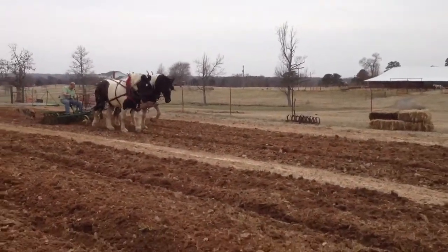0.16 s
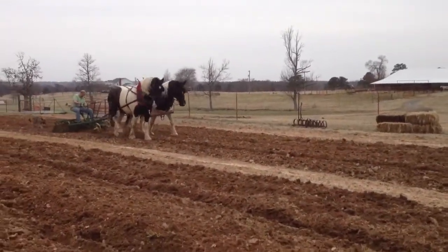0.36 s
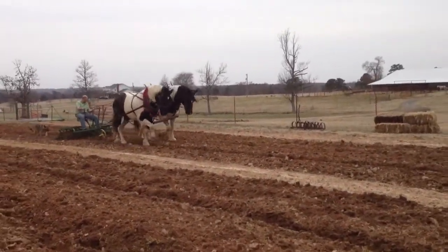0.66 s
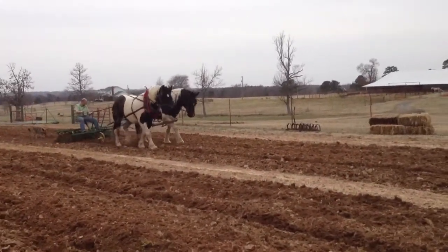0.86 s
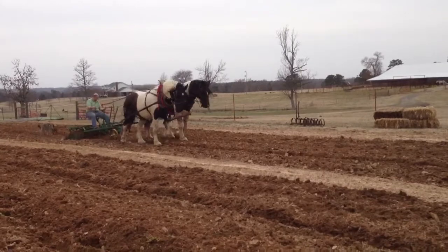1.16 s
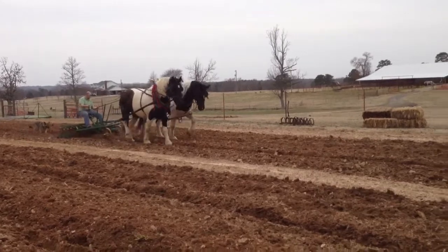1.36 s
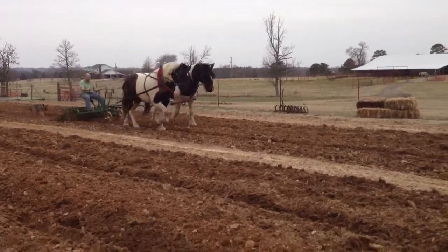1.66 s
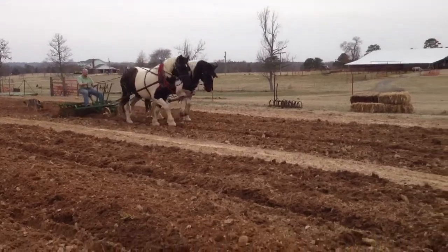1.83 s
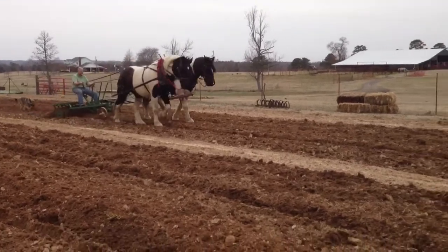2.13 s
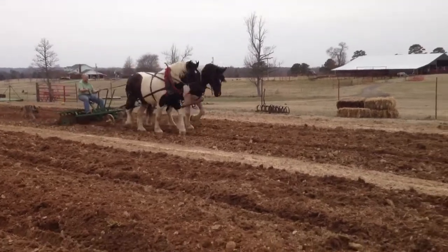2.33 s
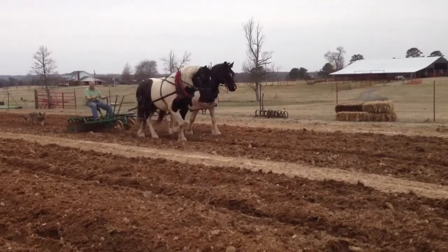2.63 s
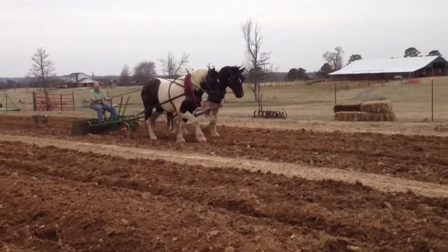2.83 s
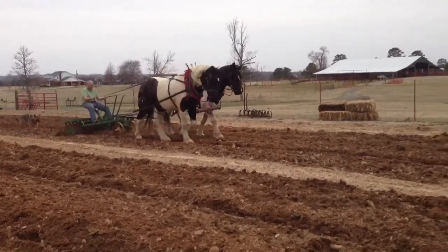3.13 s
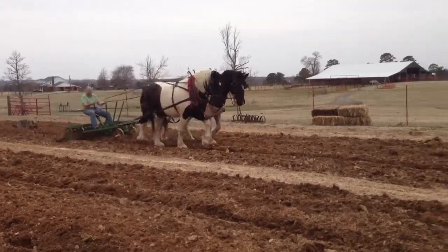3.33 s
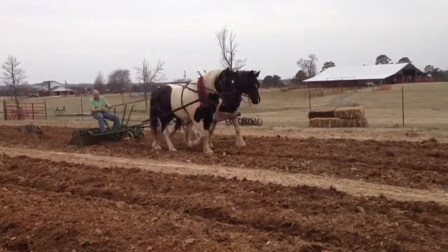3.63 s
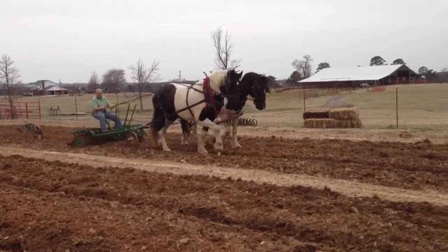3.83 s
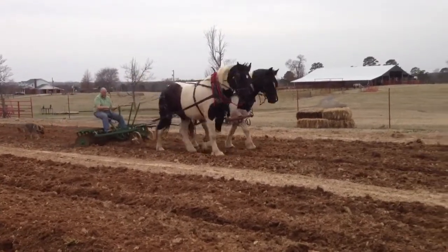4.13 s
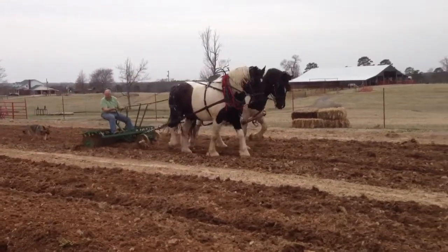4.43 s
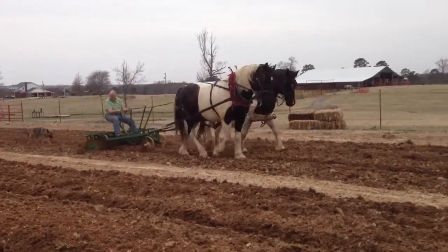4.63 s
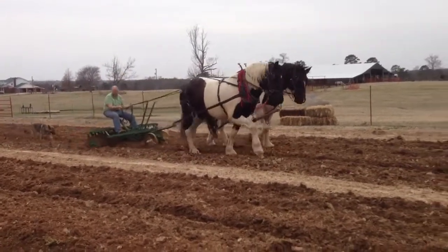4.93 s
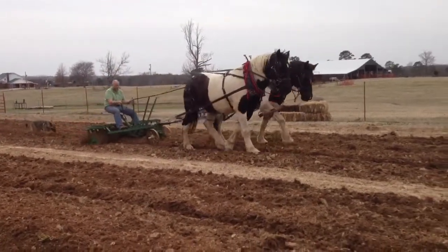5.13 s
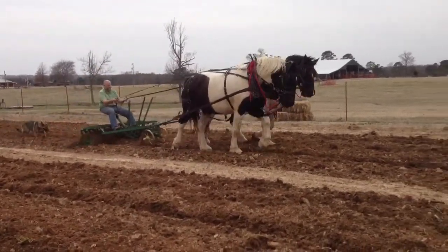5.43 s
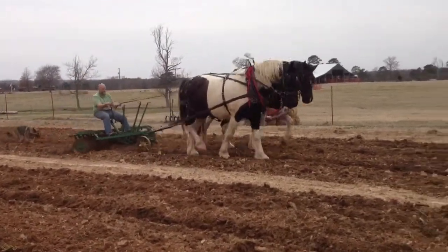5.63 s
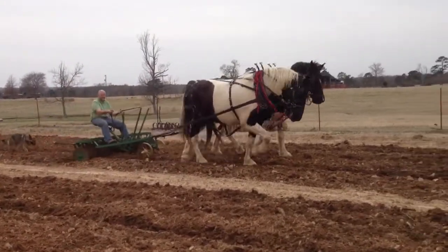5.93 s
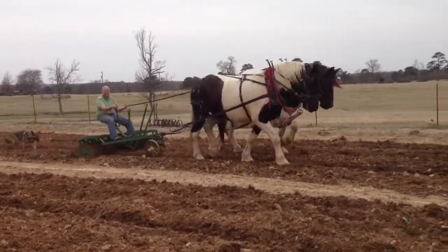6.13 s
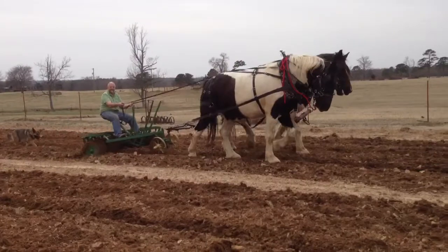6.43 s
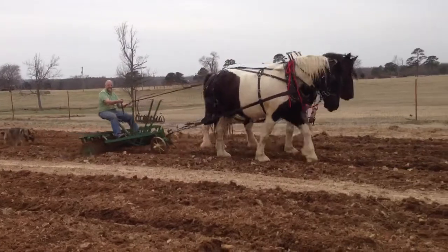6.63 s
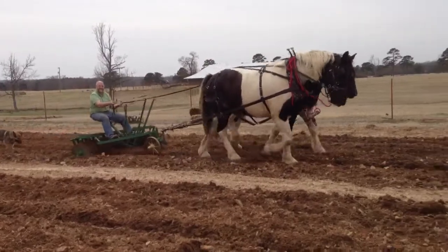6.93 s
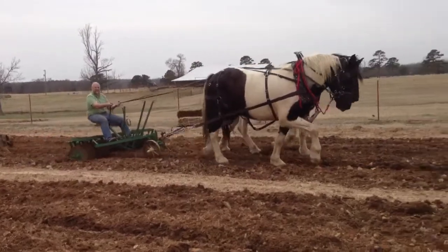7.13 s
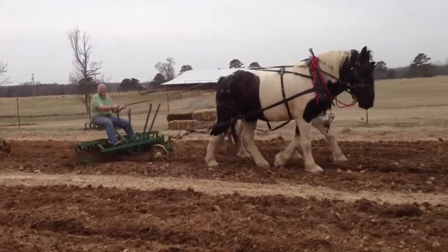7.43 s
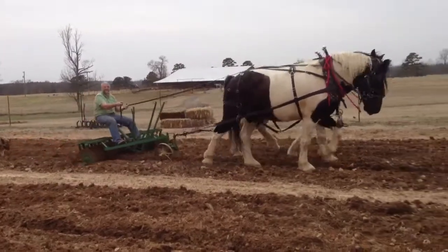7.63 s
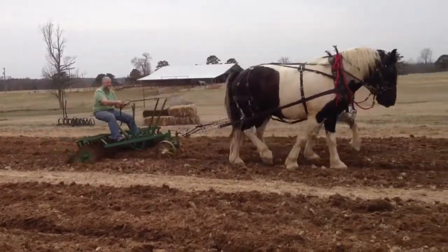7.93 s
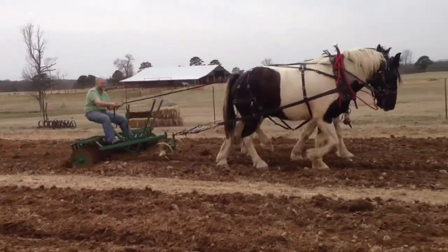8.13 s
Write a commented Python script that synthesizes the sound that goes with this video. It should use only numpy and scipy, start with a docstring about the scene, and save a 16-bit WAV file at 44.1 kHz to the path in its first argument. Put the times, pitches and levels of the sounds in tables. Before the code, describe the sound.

Outdoors in an open field, strong wind buffets an unprotected microphone with rapid low thumps and fluttering rumble for about three seconds. It then eases, uncovering the faint gritty hiss of harrow discs scraping soil, with irregular metal clatter, clinking chain links and tiny squeaks. Another gust swells around six seconds with a sharp metallic clank near its end, then calm returns with scrape and rattles.

```python
"""Gusts buffet the microphone in an open field, each puff a short low thump and a dying flutter of filtered noise.
Two horses pull a disc harrow over ploughed soil; its scrape and spray are noise coloured by ringing discs,
and random faint, short, slightly sliding tones lend the scrape a tonal grain.
Frame and hitch clatter at each jolt in bursts of noise, harness rings and chain links clink as decaying sines,
and metal squeaks or rings briefly in short, steady or sliding tones."""
import sys
import numpy as np
from scipy import signal
from scipy.fft import rfft, irfft
from scipy.io import wavfile
from scipy.ndimage import uniform_filter1d

SR = 44100
rng = np.random.default_rng(int(sys.argv[2]) if len(sys.argv) > 2 else 0)


def unload_audio(sound):
    """Save the sound as a 16-bit wav file, at the path given as the first command line argument."""
    columns = np.transpose(np.atleast_2d(sound))
    # keep every value between -1 and 1, then stretch to whole-number steps
    steps = np.round(np.clip(columns, -1, 1) * 32767)
    wavfile.write(sys.argv[1], SR, steps.astype(np.int16))


N = 364560  # samples

# Steady wind at the microphone. Each row: time in seconds, flutter level in dB before waver and lulls.
GUST_CURVE = [(0.0, -32.5), (0.14, -29.5), (0.3, -40), (0.76, -34.5), (1.24, -41), (2.02, -40), (2.67, -48),
              (2.9, -48.5), (3.13, -59), (3.66, -71), (5.02, -62), (5.36, -40.5), (5.47, -52),
              (5.73, -35.5), (5.93, -30), (6.21, -30), (6.37, -34.5), (6.99, -56), (7.29, -70), (8.26, -57)]
# Colour of the wind flutter. Each row: frequency in Hz, relative density in dB per Hz.
WIND_SPECTRUM = [(18, -68), (30, -34), (49, -43), (70, -22.5), (138, -3), (194, 1), (255, -0.5), (329, -6),
                 (500, -5), (1070, -37), (1400, -56), (1820, -48), (3080, -120)]
# Puffs on the microphone. Each row: start in seconds, thump level in dB, pitch in Hz,
# level of the dying flutter in dB relative to the thump.
PUFFS = [(0.013, -16, 280, -23), (0.046, -18, 232, -10.5), (0.085, -22, 239, -8), (0.117, -38, 214, -10),
         (0.152, -19, 203, -3.5), (0.166, -13.5, 260, -10), (0.188, -29, 207, -10),
         (0.236, -17.5, 207, -10), (0.311, -22.5, 208, -10), (0.377, -21.5, 238, -15),
         (0.444, -23, 261, -2.5), (0.464, -19.5, 397, -6), (0.523, -26, 280, -5), (0.482, -25, 420, -14),
         (0.546, -19.5, 320, -8), (0.552, -21.5, 395, -16), (0.563, -20, 250, -14), (0.593, -17, 343, -8),
         (0.64, -18.5, 232, -14), (0.691, -18.5, 273, -12), (0.755, -28.5, 430, 0), (0.801, -19, 260, -5),
         (0.812, -23, 420, -20), (0.824, -20, 276, -25), (0.833, -22.5, 302, -25), (0.879, -21, 194, -7.5),
         (0.94, -26, 328, -24), (0.955, -26.5, 222, -7), (0.9633, -22.5, 480, -14),
         (0.979, -18.5, 385, -14), (0.999, -24.5, 380, -7.5), (1.109, -24, 283, -9), (1.119, -26, 260, -22),
         (1.156, -32.5, 232, -4), (1.168, -29, 347, -18), (1.212, -27, 202, -24), (1.451, -26, 240, -3.5),
         (1.623, -19.5, 260, -6.5), (1.654, -19.5, 284, -6), (1.702, -23.5, 315, -7),
         (1.808, -14.5, 273, -13.5), (1.892, -30.5, 272, -0.5), (1.924, -27.5, 213, -2.5),
         (2.014, -33, 238, -12), (2.083, -21.5, 267, -5.5), (2.105, -24, 250, -12), (2.138, -19.5, 246, -8),
         (2.197, -19, 200, -10), (2.304, -25, 213, -11), (2.419, -39, 220, -15), (2.439, -25, 300, -4),
         (2.504, -27.5, 190, -10), (2.538, -21.5, 220, -12), (2.563, -14, 237, -16),
         (2.633, -24.5, 259, -5), (2.744, -25.5, 253, -3), (2.766, -26, 256, -21), (2.875, -43, 210, -10),
         (3.262, -37.5, 233, -17), (3.39, -33, 216, -7), (3.429, -33, 218, -20), (3.439, -28, 213, -10.5),
         (3.794, -38, 198, -7), (4.024, -36, 217, -13), (4.131, -38, 436, -6), (4.168, -40, 230, -8),
         (4.229, -35.5, 202, -12), (4.235, -44, 400, -5), (4.255, -41, 427, -7), (4.28, -47, 420, -10),
         (4.398, -41, 180, -17), (4.411, -47, 476, -3), (4.439, -38, 200, -15), (4.48, -41, 180, -10),
         (4.719, -43, 160, -7), (4.81, -45, 160, -10), (4.933, -31.5, 280, -16), (5.107, -32.5, 180, -15),
         (5.159, -43, 190, -10), (5.255, -35.5, 200, -10), (5.282, -28.5, 216, -28), (5.335, -30, 267, -7),
         (5.4, -26.5, 215, -3.5), (5.469, -23, 264, -3), (5.494, -20.5, 284, -27),
         (5.611, -26.5, 250, -9.5), (5.661, -27.5, 224, -14), (5.742, -23.5, 303, -2.5),
         (5.753, -20.5, 398, -6), (5.768, -22, 366, -13), (5.783, -23.5, 333, -5), (5.857, -30, 223, -10),
         (5.892, -29, 280, -2), (5.939, -28, 252, -12), (6.001, -19.5, 413, -1.5), (6.017, -25, 260, -20),
         (6.036, -20.5, 330, -6.5), (6.065, -19, 230, -5.5), (6.096, -19, 270, -6),
         (6.151, -19.5, 202, -5.5), (6.164, -17, 241, -18), (6.188, -25, 260, -14), (6.222, -28, 250, -12),
         (6.267, -21.5, 301, -14), (6.33, -16.5, 271, -14.5), (6.382, -24, 255, -6.5),
         (6.451, -25, 264, -14), (6.525, -40, 221, -7), (6.585, -32, 300, -14), (6.638, -31, 300, -1),
         (6.688, -35, 250, -5), (6.743, -23, 231, -7.5), (6.845, -37, 191, -19), (6.866, -34.5, 191, -26),
         (6.974, -43, 410, -11), (7.03, -43, 400, -12), (7.552, -44, 400, -4), (7.627, -39.5, 215, -10),
         (8.045, -42, 480, -17), (8.101, -44, 400, -13), (8.214, -37, 190, -5.5)]
# Brief lulls between puffs. Each row: centre in seconds, change in dB, length in seconds.
WIND_LULLS = [(0.352, -9, 0.032), (0.412, -8, 0.024), (0.509, -2.5, .05), (.578, -5.5, 0.014),
              (0.624, -5, 0.023), (0.683, -1, 0.02), (0.727, -3, .035), (0.845, -8, .015),
              (0.924, -6, 0.038), (1.077, -4.5, 0.044), (1.25, -11, 0.056), (1.4, -5, 0.021),
              (1.537, -8, 0.025), (1.785, -5, 0.029), (1.853, -10, .05), (2.058, -10, 0.046),
              (2.123, -8, 0.014), (2.266, -1, 0.033), (2.489, -2, .025), (2.727, -1, 0.062),
              (2.817, -6, .03), (5.23, -6, .05), (5.317, -12, .027), (5.553, -8, 0.06), (5.7, -5, .045),
              (5.853, -5, 0.029), (6.134, -1, 0.015), (6.301, -6, 0.033), (6.433, -3, 0.013),
              (6.5, -7, 0.033), (6.616, -8, 0.033), (6.809, -11, .05)]
# Discs in the soil. Each row: time in seconds, scrape in dB, spray of the high treble in dB,
# level of the low noise in dB, which in the gusts is partly wind; all before the flicker.
SCRAPE_CURVE = [(0.0, -54.5, -59, -39.5), (0.32, -51.5, -58.5, -65), (0.66, -53.5, -60.5, -65),
                (1.06, -50, -58.5, -59), (2.67, -50, -58, -65), (2.81, -49.5, -54.5, -64),
                (3.11, -50.5, -57, -61), (3.52, -46.5, -54.5, -56.5), (4.09, -47.5, -53.5, -58),
                (4.76, -51, -57, -58.5), (5.52, -47.5, -53, -62), (6.3, -49.5, -54.5, -50),
                (6.72, -48, -53.5, -59.5), (7.08, -49.5, -55, -57), (7.55, -49, -56.5, -56.5),
                (7.84, -47.5, -52, -50), (8.03, -51.5, -58, -55.5), (8.26, -47.5, -55.5, -48)]
# Colour of the scraped soil. Each row: frequency in Hz, relative density in dB per Hz.
SOIL_SPECTRUM = [(35, -78), (60, -10.5), (142, -4.5), (253, -19), (403, 5.5), (705, -7.5), (849, 2),
                 (1150, 2), (1380, 3), (1670, 3), (4220, 5), (9080, -4), (13800, -15), (15500, -16)]
# Resonances of the discs. Each row: frequency in Hz, width in Hz, height in dB over the soil.
DISC_RINGS = [(425, 480, 0), (820, 92, 2.5), (1392, 110, 6.5), (2030, 25, 4.5), (2900, 220, 2.5),
              (4420, 140, 0.5), (4300, 180, 1), (5730, 270, 3), (8700, 37, 8.5)]
# Jolts of frame and hitch. Each row: peak time in seconds, nominal level in dB, ring in Hz,
# treble in dB relative to the jolt, fall in ms per 60 dB, rise in ms per 60 dB.
MAIN_JOLTS = [(.126, -56, 4200, 2, 30, 10), (.152, -47, 4230, -10, 150, 13),
              (.1886, -41.5, 4100, -6.5, 72, 20), (.241, -50, 4200, 1, 30, 10),
              (.263, -50, 4100, -8, 150, 44), (.448, -37, 2960, -19, 40, 15),
              (.455, -44, 2140, -4, 124, 30), (.518, -45, 4300, -0.5, 28, 10), (.702, -62, 4200, 2, 25, 10),
              (.79, -52, 5600, -2, 25, 10), (.845, -50, 1376, -18, 200, 25),
              (.855, -48.5, 4220, -5, 40, 15), (.935, -56, 4600, -1, 25, 10), (.96, -47, 4250, -8, 30, 12),
              (.979, -47, 4030, -3, 30, 17), (1.0117, -38.5, 4220, -17, 35, 14),
              (1.0215, -31, 4400, -26, 26, 1), (1.0235, -33, 3570, -27, 43, 8),
              (1.036, -39, 3700, -17, 50, 50), (1.046, -41, 4300, -12, 30, 15),
              (1.0495, -30.5, 4270, -29, 35, 23), (1.053, -38.5, 1460, -27, 50, 40),
              (1.057, -36.5, 3260, -27, 52, 60), (1.0605, -41, 4300, -25, 30, 25),
              (1.0625, -39.5, 1570, -25, 47, 25), (1.129, -48, 5600, -7, 28, 12),
              (1.133, -41, 4400, -15, 29, 22), (1.265, -43, 980, -18, 68, 23),
              (1.2705, -44, 4900, -14, 40, 20), (1.2784, -36, 4330, -16, 41, 14),
              (1.281, -35, 1096, -24, 40, 12), (1.2825, -44, 2930, -20, 40, 12),
              (1.287, -36.5, 1040, -24, 52, 20), (1.3214, -40.5, 2890, 1, 40, 14),
              (1.327, -43, 2860, -3, 70, 20), (1.421, -50, 4250, -16, 40, 20),
              (1.519, -53, 5600, -2, 30, 10), (1.566, -53, 5600, 3, 30, 10),
              (1.642, -38.5, 5940, -7, 74, 15), (1.697, -49, 3600, -12, 35, 15),
              (1.852, -42, 3320, -10, 30, 20), (1.887, -38.5, 4230, -17, 34, 21),
              (2.003, -55, 5600, 5, 25, 10), (2.074, -47, 2680, 4, 25, 13), (2.147, -42, 1400, -13, 50, 80),
              (2.187, -42, 1400, -18, 40, 15), (2.229, -46, 3600, -14, 35, 15),
              (2.296, -42.5, 4630, 1, 120, 6), (2.3005, -32, 1088, -19, 64, 10),
              (2.309, -36.5, 3050, -17, 80, 20), (2.3233, -33.5, 2920, -9, 25, 20),
              (2.403, -45, 2970, -1, 40, 15), (2.65, -38, 5380, -21, 53, 38),
              (2.692, -40, 4100, -14, 122, 90), (2.786, -45, 4250, 2, 30, 10),
              (2.849, -51, 2900, -14, 38, 17), (2.982, -48, 2920, 0, 35, 12), (3.048, -52, 5550, 2, 30, 10),
              (3.138, -51, 3580, -14, 30, 12), (3.1685, -41, 3390, -22, 60, 12),
              (3.247, -46, 5260, -16, 23, 10), (3.301, -46, 2900, -14, 40, 40),
              (3.3456, -37.5, 4410, 5.5, 106, 5), (3.354, -37.5, 2810, -6, 43, 22),
              (3.3535, -37, 4400, -10, 30, 15), (3.3555, -32.5, 1250, -12, 40, 25),
              (3.382, -45, 4400, -2, 40, 40), (3.392, -41.5, 3460, 0, 90, 120),
              (3.507, -44, 4250, -10, 30, 20), (3.514, -33, 3200, -12, 30, 18),
              (3.577, -43, 2130, -20, 170, 25), (3.663, -39.5, 3550, -19, 36, 25),
              (3.804, -40.5, 2970, -6, 80, 28), (3.819, -35.5, 1895, -19, 60, 72),
              (3.893, -42, 2850, -15, 85, 8), (4.042, -36, 3400, -19, 40, 36),
              (4.137, -41.5, 3600, -14, 35, 15), (4.153, -48, 1400, -3, 35, 15),
              (4.229, -33.5, 3720, -15, 35, 30), (4.247, -37.5, 1510, -12, 50, 62),
              (4.2585, -35.5, 3240, -8, 61, 40), (4.2885, -32, 3620, -10, 30, 25),
              (4.291, -33.5, 4180, -8, 35, 27), (4.405, -42, 3570, -14, 80, 12),
              (4.417, -35, 1220, -4, 22, 15), (4.426, -42.5, 2610, -2, 64, 25),
              (4.457, -41, 2750, 1, 40, 31), (4.525, -44, 2170, -12, 35, 10),
              (4.548, -41, 2860, -25, 70, 15), (4.5615, -47, 4270, 8, 25, 4),
              (4.642, -44.5, 3380, -15, 38, 30), (4.718, -45.5, 3460, -13, 62, 90),
              (4.737, -47, 1400, -2, 30, 10), (4.7935, -42, 6100, 1, 25, 5), (4.804, -47, 1400, -8, 40, 20),
              (4.875, -52, 5600, 5, 25, 8), (4.9145, -40, 4180, -19, 28, 15),
              (5.03, -45.5, 2930, -17, 45, 30), (5.085, -51, 2880, -18, 55, 25),
              (5.17, -56, 2550, 4, 35, 15), (5.256, -45, 2990, -8, 65, 80),
              (5.2874, -44.5, 1350, -18, 77, 23), (5.3244, -40.5, 2980, -15, 40, 17),
              (5.373, -43, 3600, -15, 35, 15), (5.411, -42, 1423, -19, 106, 76),
              (5.4614, -36, 2240, -16, 114, 32), (5.495, -38, 2880, 3, 40, 10),
              (5.5016, -41.5, 5500, 3, 50, 18), (5.5795, -38, 5540, -0.5, 27, 20),
              (5.587, -40, 3540, -15, 50, 30), (5.623, -41.5, 1430, -19, 100, 34),
              (5.638, -33, 4260, -21, 60, 88), (5.6465, -32, 5050, -22, 54, 42),
              (5.651, -38.5, 1445, -18, 60, 42), (5.789, -37.5, 4670, -8, 33, 28),
              (5.708, -57, 5600, -3, 25, 10), (5.903, -49, 5600, 2, 30, 10),
              (5.93, -31.5, 1930, -18, 60, 20), (6.123, -34.5, 1730, -5.5, 47, 8),
              (6.134, -42, 4260, -17, 37, 74), (6.324, -42, 1390, -9, 50, 42),
              (6.402, -31.5, 3620, -8.5, 57, 20), (6.452, -55, 5540, -4, 25, 10),
              (6.496, -46.5, 2200, -6, 37, 10), (6.579, -39.5, 1210, -14, 80, 10),
              (6.5889, -22.5, 4630, -14, 26, 4), (6.5925, -31, 4400, -15, 35, 12),
              (6.5965, -32, 1770, -20, 72, 25), (6.6098, -29.5, 3395, -6, 64, 46),
              (6.639, -43, 6250, -2, 35, 15), (6.656, -43.5, 2140, -23, 130, 50),
              (6.745, -38, 3570, -25, 45, 13), (6.979, -38, 3800, -12, 74, 34),
              (7.031, -45, 1400, -15, 50, 20), (7.104, -47.5, 1420, -18, 50, 20),
              (7.347, -47, 2900, -14, 40, 20), (7.581, -42.5, 3070, -21, 36, 28),
              (7.627, -44, 2900, -15, 50, 25), (7.674, -42.5, 3370, -17, 105, 50),
              (7.6986, -41, 3340, -11, 52, 20), (7.733, -38, 1850, -6, 52, 12),
              (7.739, -36, 4620, -7, 70, 20), (7.75, -30.5, 4750, -2.5, 35, 12),
              (7.76, -41, 1330, -12, 50, 20), (7.771, -41, 3720, -17, 60, 25),
              (7.781, -54, 4800, -13, 50, 25), (7.801, -54, 1210, -15, 35, 15),
              (7.853, -48, 5600, 10, 70, 8), (7.8555, -39.5, 1670, 1, 40, 20),
              (7.87, -44, 970, -15, 40, 25), (7.9067, -37.5, 3560, -17, 50, 18),
              (7.913, -42, 5660, -13, 60, 18), (7.92, -44, 2050, -15, 50, 30),
              (7.9265, -37.5, 5500, -13, 68, 6), (7.936, -41, 3600, -12, 60, 40),
              (8.003, -41.5, 1800, -23, 55, 15), (8.061, -42, 3440, -15, 55, 80),
              (8.19, -52, 5600, 0, 25, 10), (8.205, -46, 3580, -14, 35, 15)]
# Steel of frame and hitch under a jolt. Each row: frequency in Hz, width in Hz, relative level in dB.
STEEL_MODES = [(1225, 140, -10), (1420, 160, -1), (1805, 180, -5), (2160, 180, -6.5), (2900, 160, -0.5),
               (3580, 280, 0.5), (4190, 250, -2), (4650, 160, 2.5), (5700, 360, 2), (6530, 250, -15)]
# Ringing metal parts by name. Each row of a part: frequency in Hz, relative level in dB,
# decay by 60 dB in seconds.
METAL_PARTS = { "frame": [(504, 8, 0.043), (853, 7.5, 0.042), (1206, 0.5, 0.15)], "ring": [(6712, 0, .075),
               (12472, -5, .06), (12833, -9, .05), (12876, -9, .05)], "hook": [(6282, 0, .4),
               (10355, -8, .2), (11585, -13, .2)], "link": [(8500, -3, .14)], "pin": [(2866, 11.5, 0.069)],
               "bar": [(1542, 3.5, 0.073), (1950, -1, .07), (2960, -2, .07), (2670, -7, .1)],
               "clevis": [(1504, 0.5, 0.066), (2100, -8, .06), (3252, -12, .05), (3700, -11, .035)], }
# Unevenness of each loose part's ring by name: rms depth in dB.
PART_RATTLE = {"frame": 2.5, "ring": 3, "hook": .6, "link": 1, "pin": 3, "bar": 3.5, "clevis": 3.5}
# Clinks. Each row: start in seconds, name of the part, nominal level in dB, swell in seconds.
CLINK_TIMES = [(.22, "link", -55, .01), (1.2595, "link", -41, 0.0043), (1.263, "frame", -49, 0.0061),
               (1.279, "frame", -49, 0.0032), (1.51, "ring", -64, .006), (2.297, "frame", -44.5, 0.0023),
               (2.33, "link", -48, 0.012), (3.35, "ring", -42, 0.052), (3.352, "frame", -49, 0.019),
               (3.514, "pin", -47, 0.0055), (3.533, "link", -48, 0.0045), (3.804, "bar", -39.5, 0.02),
               (3.809, "frame", -53.5, 0.004), (4.03, "clevis", -37, 0.015), (4.234, "clevis", -48, 0.024),
               (4.075, "link", -53, 0.064), (4.409, "frame", -50, .005), (4.415, "frame", -43.5, 0.0038),
               (4.437, "frame", -53, 0.028), (4.588, "link", -53, .01), (5.15, "link", -48, 0.018),
               (5.457, "hook", -42, 0.0037), (5.462, "frame", -43.5, 0.0051), (5.496, "ring", -39, 0.039),
               (5.573, "link", -46, .006), (6.61, "hook", -43.5, .004), (6.844, "pin", -55.5, 0.0038),
               (7.06, "link", -45.5, .01), (7.731, "frame", -43.5, 0.0014)]
# Squeaks and brief rings of metal. Each row: start in seconds, length in seconds, first pitch in Hz,
# last pitch in Hz, level in dB before its waver.
METAL_TONES = [(2.487, 0.042, 2990, 2980, -49.5), (2.652, .035, 5430, 5380, -49),
               (3.912, .04, 1430, 1414, -45.5), (3.994, .035, 3550, 3450, -42),
               (4.06, 0.024, 2880, 2850, -42.5), (4.649, 0.046, 3000, 2900, -50),
               (4.755, 0.03, 3050, 2910, -41.5), (5.027, .014, 2870, 2980, -49),
               (5.024, 0.046, 2700, 2540, -48), (5.115, 0.04, 4550, 4820, -52),
               (7.869, 0.022, 2910, 2850, -45), (7.9, 0.036, 3530, 3550, -56),
               (7.91, 0.022, 1160, 1190, -42), (8.073, 0.018, 4760, 4850, -42.5)]

PUSH_S = 0.004795  # time scale of a thump, and delay of its peak
FLUTTER_RISE_S, FLUTTER_FALL_S = 0.0082, 0.35  # rise; fall per 60 dB
EDDIES_PER_S, EDDY_DB = 25, 3.5  # small thumps, and the most they exceed the steady flutter
SWELL_DB = 2  # rms depth of the steady wind's waver
BRIGHTEN_DB_PER_DB, MID_WIND_DB = 0.78, -28  # stronger wind carries more above 350 Hz
# a few lesser jolts at random times
SMALL_PER_S, SMALL_DB, SMALL_SPREAD_DB, SMALL_TREBLE_DB = 4, -51.5, 5.5, -17
SMALL_FALL_MS, SMALL_RISE_MS = (25, 120), (12, 60)  # ranges, per 60 dB
NEARING_DB_PER_S, TOP_DB_PER_S = .5, 1.33  # lesser jolts and highest treble grow as the team draws near
FRAME_DB = -16.5  # low modes relative to the jolt
TICKS_PER_S, TICK_S, TICK_FLOOR = 1100, 0.00087, 1.8  # contacts in a jolt, their decay, hiss between them
RING_PURE = 0.31  # power share of a jolt's ring that is a clear tone
STEEL_SHARE = 0.69  # steel modes against plain rattle
STRIKE_DB, AWAY_DB_PER_OCTAVE = 4.5, -5  # random spread per blow; fall away from the jolt's ring
EDGE_HZ = 15450  # upper band limit


def gain_of(db):
    """Decibels to gain."""
    return 10 ** (np.asarray(db) / 20)


def evened(x):
    """Scales to rms 1."""
    return x / np.sqrt(np.mean(x ** 2) + 1e-20)


def read(points, hz):
    """Reads a spectrum on a log-frequency axis."""
    f, value = np.transpose(points)
    return np.interp(np.log(hz + 1), np.log(f + 1), value)


def follow(rows, column, t):
    """Reads one column of a curve at times t."""
    rows = np.array(rows)
    return np.interp(t, rows[:, 0], rows[:, column])


def add(mix, s, sound):
    """Mixes a sound in at s seconds."""
    at = round(s * SR)
    sound = sound[max(-at, 0):]
    part = mix[max(at, 0):][:len(sound)]
    part += sound[:len(part)]


def band(x, lo_hz, hi_hz, order=2):
    """Band-pass."""
    sos = signal.butter(order, [lo_hz, min(hi_hz, .45 * SR)], "band", fs=SR, output="sos")
    return signal.sosfilt(sos, x)


def causal(db):
    """Minimum-phase impulse response, starting at once, for a gain given on 4097 bins."""
    log_gain = np.log(gain_of(np.maximum(db, -100)))
    circle = np.concatenate([log_gain, log_gain[-2:0:-1]])
    return np.fft.ifft(np.exp(np.conj(signal.hilbert(circle)))).real[:4096]


def sparse_hits(per_s, spread_db, most):
    """Impulses at random times, of either sign, with exponentially spread levels in dB."""
    size = gain_of(spread_db * np.minimum(rng.exponential(1, N), most))
    return size * (rng.random(N) < per_s / SR) * rng.choice([-1, 1], N)


def wind_flutter():
    """Turbulence at the microphone port: lumpy random impulses in the wind's colour, softly limited."""
    eddies = sparse_hits(350, 0.97, 3)
    lumps = gain_of(2.6 * evened(band(rng.standard_normal(N), 31.5, 80, order=1)))
    colour = causal(read(WIND_SPECTRUM, np.fft.rfftfreq(8192, 1 / SR)))
    flutter = evened(signal.oaconvolve(eddies * lumps, colour)[:N])
    return 2.52 * np.tanh(flutter / 3.12)


def wind_strength():
    """Steady wind's gain and total power: each puff adds a dying power, each lull lowers both."""
    t, after = np.arange(N) / SR, np.arange(SR // 2) / SR
    waver = evened(band(rng.standard_normal(N), 5.2, 7.6, order=1))
    steady = gain_of(follow(GUST_CURVE, 1, t) + SWELL_DB * waver)
    power = steady ** 2
    for s, db, _, flutter_db in PUFFS:
        dying = gain_of(db + flutter_db - 60 * after / FLUTTER_FALL_S) ** 2
        add(power, s, np.minimum(after / FLUTTER_RISE_S, 1) * dying)
    coarse = t[::32]
    lull_db = sum(db * np.exp(-(2 * (coarse - s) / length) ** 4) for s, db, length in WIND_LULLS)
    calm = gain_of(np.interp(t, coarse, lull_db))
    return steady * calm, power * calm ** 2


def thump(db, hz, turn, long):
    """One push of air: a short pulse of falling pitch with a sharp edge at its peak."""
    u = np.arange(-800, 1400) / SR
    spread = PUSH_S * (0.46 + 0.38 * long) * np.where(u > 0, 1.1, .7)  # quick push, slower release
    phase = 2 * np.pi * (hz * u * (1 - 15 * u) + turn)
    push = np.exp(-np.abs(u / spread) ** 1.5)
    snap = 0.19 * np.exp(-(u / 0.0026) ** 2) * np.sin(1.84 * phase)
    return gain_of(db) * (push * np.sin(phase) + snap)


def wind():
    """Wind at the microphone: flutter that each puff lifts and brightens, with puffs and eddies as thumps."""
    flutter = wind_flutter()
    steady, power = wind_strength()
    upper = signal.sosfiltfilt(signal.butter(2, 350, "high", fs=SR, output="sos"), flutter)
    lower = flutter - upper
    # the upper part comes in sharp flaps
    upper *= evened(gain_of(3 * evened(band(rng.standard_normal(N), 24, 70, order=1))))
    lift_db = BRIGHTEN_DB_PER_DB * (10 * np.log10(power) - MID_WIND_DB)
    out = np.sqrt(power) * (lower + gain_of(np.clip(lift_db, -12, 8)) * upper)
    thumps = [(s, db, hz) for s, db, hz, _ in PUFFS]
    for at, size, pitch, keep in rng.random((400, 4)):
        if keep < EDDIES_PER_S * N / SR / 400:
            db = 20 * np.log10(steady[int(at * N)]) + EDDY_DB * size
            thumps.append((at * N / SR, db, 210 + 190 * pitch))
    for (s, db, hz), (turn, long) in zip(thumps, rng.random((len(thumps), 2))):
        add(out, s + PUSH_S - 800 / SR, thump(db, hz, turn, long))
    return band(out, 112, 1030, order=3)


def scrape():
    """Hiss of soil and grit of small stones, coloured by the ringing discs."""
    crumb = rng.standard_normal(300) * np.exp(-np.arange(300) / 23.0)
    crumbs = signal.oaconvolve(sparse_hits(500, 2.3, 4), crumb)[:N]
    drive = rng.standard_normal(N) + 0.44 * evened(crumbs)
    fine = np.fft.rfftfreq(8192, 1 / SR)
    rings = sum((gain_of(db) ** 2 - 1) / (1 + (2 * (fine - f) / w) ** 2) for f, w, db in DISC_RINGS)
    colour_db = read(SOIL_SPECTRUM, fine) + 10 * np.log10(np.maximum(1 + rings, .05))
    x = signal.oaconvolve(drive, causal(colour_db))[:N]
    # low noise, scrape and spray cross-fade over frequency and follow their own levels
    hz, t, z = signal.stft(x, SR, nperseg=512, noverlap=384)
    low = np.clip((850 - hz[:, None]) / 200, 0, 1)
    high = np.clip((hz[:, None] - 4500) / 3000, 0, 1)
    low_rms = np.std(band(x, 270, 946, order=4))
    scrape_rms = np.std(band(x, 900, 6000, order=4))
    spray_rms = np.std(band(x, 6000, 15000, order=4))
    level = low * gain_of(follow(SCRAPE_CURVE, 3, t)) / low_rms
    level += (1 - low - high) * gain_of(follow(SCRAPE_CURVE, 1, t)) / scrape_rms
    level += high * gain_of(follow(SCRAPE_CURVE, 2, t)) / spray_rms
    grain = rng.standard_normal((len(t), len(hz))).T
    patches = evened(uniform_filter1d(uniform_filter1d(grain, 8, 0), 12, 1))
    flicker = evened(uniform_filter1d(rng.standard_normal(len(t)), 5))  # clods breaking, heard in all bands
    uneven = gain_of((2.0 + 1.85 * low) * patches + 1.55 * flicker)
    return signal.istft(z * level * uneven, SR, nperseg=512, noverlap=384)[1][:N]


def tonal_grain():
    """Random faint, short, slightly sliding tones lend the scrape a tonal grain."""
    out, u = np.zeros(N), np.arange(2500) / SR
    for at, pitch, size, slide, hold in rng.random((330, 5)):
        hz, t60 = 1300 * 6.5 ** pitch, 0.019 + 0.026 * hold
        turns = hz * u * (1 + 2.3 * (slide - .5) * u)
        onset = 1 - np.exp(-u / 0.0023)
        decay = gain_of(-53 - 4 * np.log(size + .12) - 60 * u / t60)
        add(out, at * N / SR, decay * onset * np.sin(2 * np.pi * turns))
    return out


def lesser_jolts():
    """A few small jolts at random times, in the columns of the main ones, growing as the team draws near."""
    rows = []
    for at, size, pitch, edge, hold, soft in rng.random((round(SMALL_PER_S * N / SR), 6)):
        s = at * N / SR
        db = SMALL_DB + SMALL_SPREAD_DB * size + NEARING_DB_PER_S * (s - .5 * N / SR)
        fall_ms = np.interp(hold, [0, 1], SMALL_FALL_MS)
        rise_ms = np.interp(soft, [0, 1], SMALL_RISE_MS)
        rows.append((s, db, 1300 * 4 ** pitch, SMALL_TREBLE_DB + 16 * (edge - .5), fall_ms, rise_ms))
    return rows


def steel_body(noise, ring_hz):
    """Noise through the steel's resonances, each blow favouring other modes near its own ring."""
    away = np.abs(np.log2(np.array(STEEL_MODES)[:, 0] / ring_hz[:, None]))  # octaves
    struck = gain_of(STRIKE_DB * rng.standard_normal(away.shape) + AWAY_DB_PER_OCTAVE * away)
    bins = np.fft.rfftfreq(noise.shape[1], 1 / SR)
    peaks = np.array([gain_of(db) ** 2 / w / (1 + (2 * (bins - f) / w) ** 2) for f, w, db in STEEL_MODES])
    steel = irfft(rfft(noise) * np.sqrt(struck ** 2 @ peaks), noise.shape[1])
    return steel / steel.std(axis=1, keepdims=True)


def jolts():
    """Each jolt is an uneven rattle of contacts: body, treble, the frame's low modes and one ring of steel."""
    out, u = np.zeros(N), np.arange(-1500, 3500) / SR
    rows = list(MAIN_JOLTS) + lesser_jolts()
    noises = rng.standard_normal((len(rows), 5, len(u))).transpose(1, 0, 2)
    body_noise, treble_noise, frame_noise, tick_noise, ring_noise = noises
    plain = evened(band(body_noise, 1150, 6000))
    steel = steel_body(body_noise, np.array(rows)[:, 2])
    body = evened((1 - STEEL_SHARE) * plain + STEEL_SHARE * steel)
    treble = evened(band(treble_noise, 6270, 10300))
    top = evened(band(treble_noise, 11000, 15200))
    frame = evened(sum(gain_of(db) * band(frame_noise, f - 5.8 / t60, f + 2.1 / t60, order=1)
                       for f, db, t60 in METAL_PARTS["frame"]))
    ticks = np.abs(tick_noise) * (rng.random(tick_noise.shape) < TICKS_PER_S / SR)
    ticks[:, np.searchsorted(u, -.001)] = 0.96  # the main contact
    ticks = signal.lfilter([1], [1, -np.exp(-1 / (TICK_S * SR))], ticks)
    chatter = evened(TICK_FLOOR + ticks)
    for k, (s, db, hz, treble_db, fall_ms, rise_ms) in enumerate(rows):
        share = np.clip(0.41 + 0.0059 * (db + 37), .1, .8)  # harder jolts ring more
        rough_ring = evened(band(ring_noise[k], hz * 0.953, hz * 1.053, order=1))
        clear_ring = np.sqrt(2) * np.sin(2 * np.pi * hz * u)
        ring = np.sqrt(1 - RING_PURE) * rough_ring + np.sqrt(RING_PURE) * clear_ring
        # more treble also reaches higher
        top_db = 0.78 * min(treble_db, 3) - 13.5 + TOP_DB_PER_S * s
        bright = treble[k] + gain_of(top_db) * top[k]
        rise = 60 * np.minimum(u + 0.0011, 0) / (rise_ms / 1000)  # dB
        fall = -60 * np.maximum(u - .001, 0) / (fall_ms / 1000)  # dB
        burst = np.sqrt(1 - share) * body[k] * chatter[k] * gain_of(fall)
        burst += np.sqrt(share) * ring * gain_of(0.76 * fall)
        burst += gain_of(FRAME_DB + 0.45 * fall) * frame[k]
        burst += gain_of(treble_db + 1.4 * fall + 0.33 * rise) * bright * chatter[k]
        add(out, s + u[0], gain_of(db + rise) * burst)
    return out


def clinks():
    """Freely ringing metal parts; a rattling contact makes the ring swell before it dies."""
    out, u = np.zeros(N), np.arange(SR // 2) / SR
    phases = rng.random((len(CLINK_TIMES), 4))
    noise = rng.standard_normal((len(CLINK_TIMES), 4, len(u) + 2000))
    shakes = evened(band(noise, 30, 220, order=1)[..., 2000:])  # without the filter's start
    for (s, part, db, swell), turns, shake in zip(CLINK_TIMES, phases, shakes):
        for (hz, mode_db, t60), turn, rattle in zip(METAL_PARTS[part], turns, shake):
            onset = np.clip(0.57 + 0.75 * u / swell, 0, 1)
            decay = gain_of(-60 * np.maximum(u - swell, 0) / t60)
            level = gain_of(db + mode_db + PART_RATTLE[part] * rattle)
            add(out, s, level * onset * decay * np.sin(2 * np.pi * (hz * u + turn)))
    return out


def metal_tones():
    """Squeaks and brief rings of metal: short, steady or sliding tones with an unsteady level."""
    out = np.zeros(N)
    for s, length, from_hz, to_hz, db in METAL_TONES:
        u = np.arange(0, length, 1 / SR)
        waver = gain_of(2.5 * evened(band(rng.standard_normal(4000), 40, 200, order=1)))[:len(u)]
        turns = from_hz * u + (to_hz - from_hz) * u ** 2 / (2 * length)
        shape = np.sin(np.pi * u / length) ** 0.52
        add(out, s, gain_of(db) * waver * shape * np.sin(2 * np.pi * turns))
    return out


def scene():
    """Wind at the microphone over the harrow in the field."""
    return (wind() + scrape() + tonal_grain() + jolts() + clinks() + metal_tones())[None]


def record(dry):
    """The microphone's low cut, then the upper band limit."""
    cut = signal.sosfilt(signal.butter(2, 70, "high", fs=SR, output="sos"), dry)
    limit = signal.firwin(511, EDGE_HZ, window=("kaiser", 9), fs=SR)
    return signal.oaconvolve(cut, limit[None], "same")


dry = scene()
out = record(dry)
unload_audio(out)
```